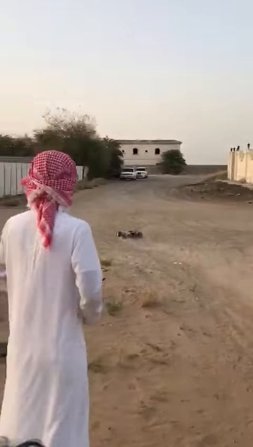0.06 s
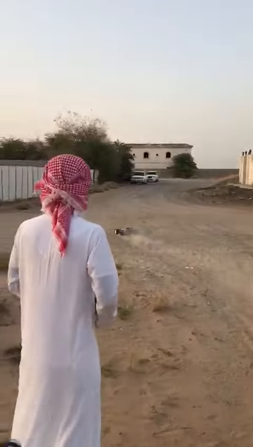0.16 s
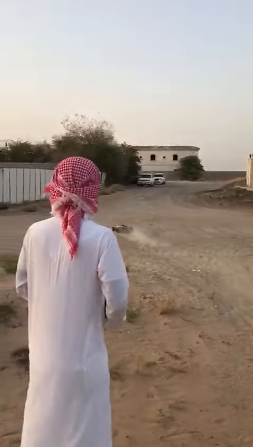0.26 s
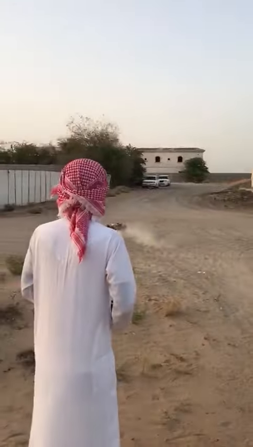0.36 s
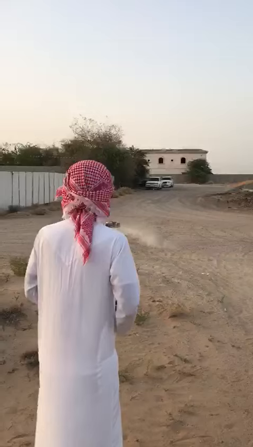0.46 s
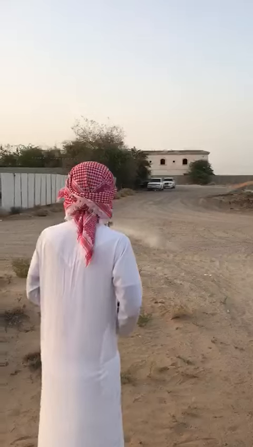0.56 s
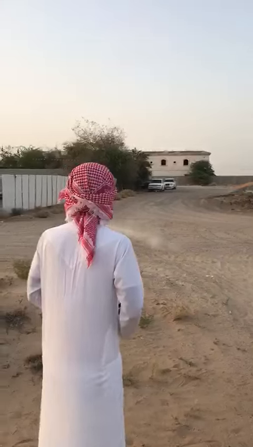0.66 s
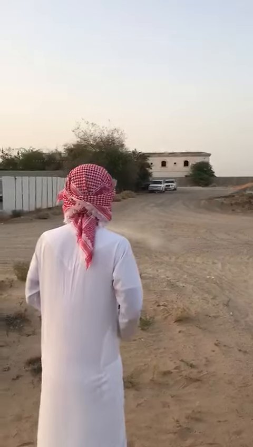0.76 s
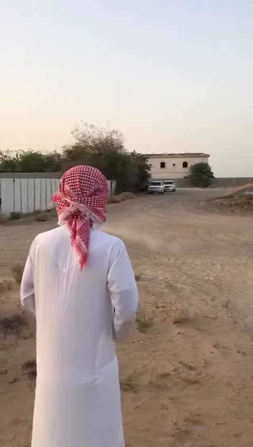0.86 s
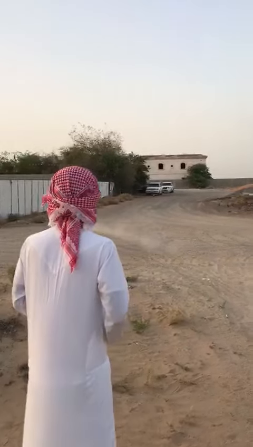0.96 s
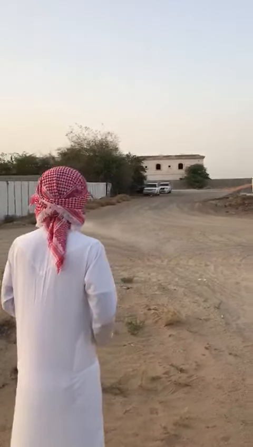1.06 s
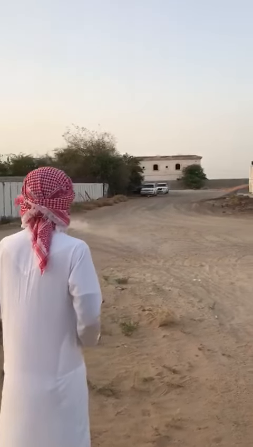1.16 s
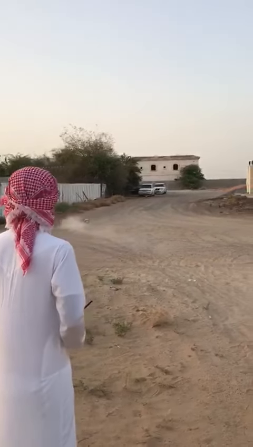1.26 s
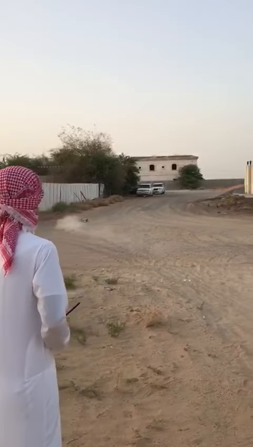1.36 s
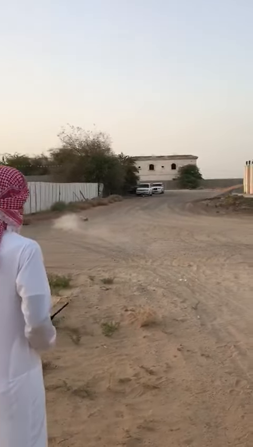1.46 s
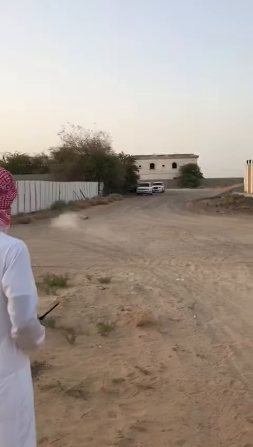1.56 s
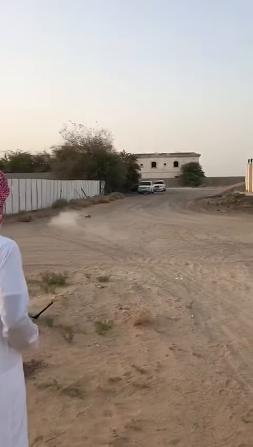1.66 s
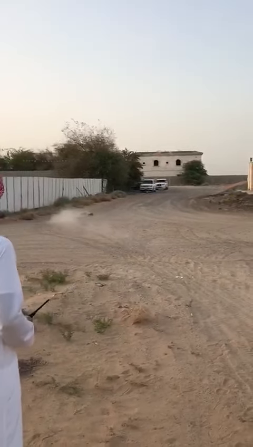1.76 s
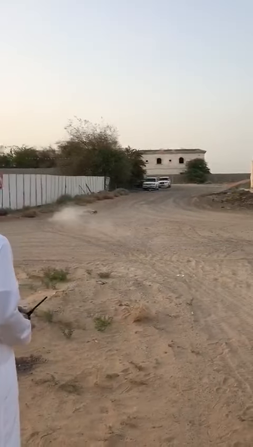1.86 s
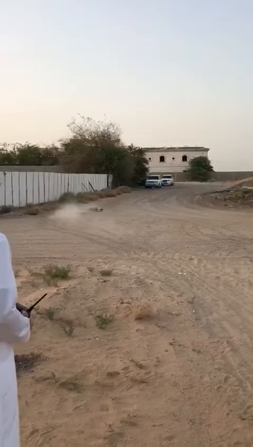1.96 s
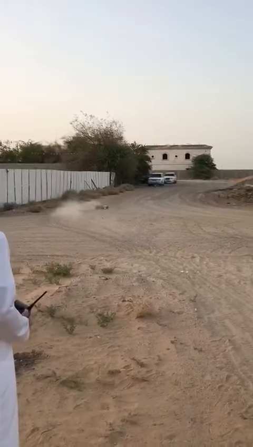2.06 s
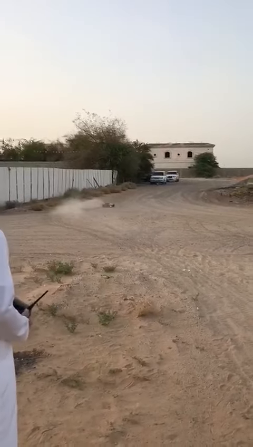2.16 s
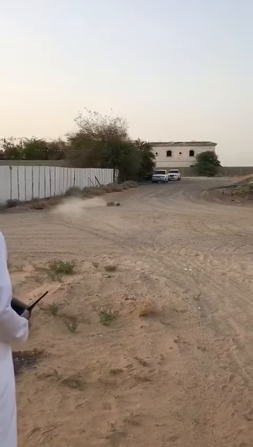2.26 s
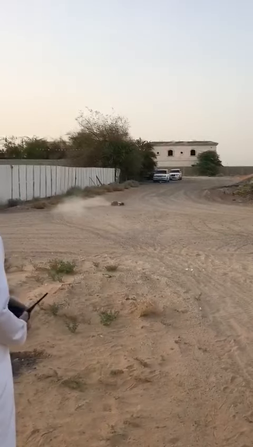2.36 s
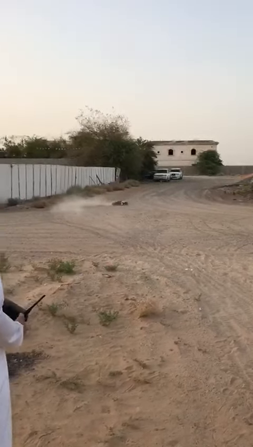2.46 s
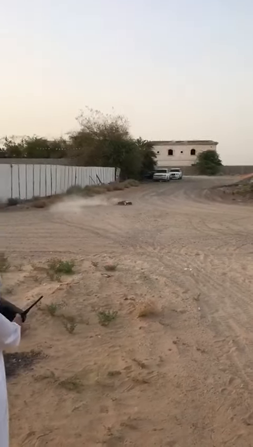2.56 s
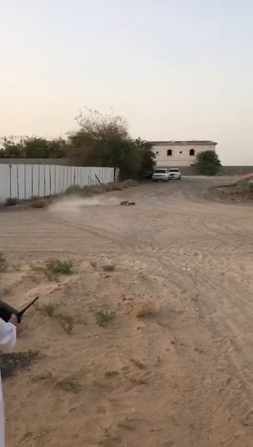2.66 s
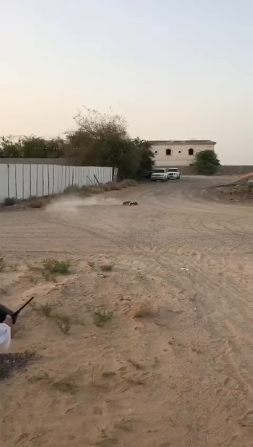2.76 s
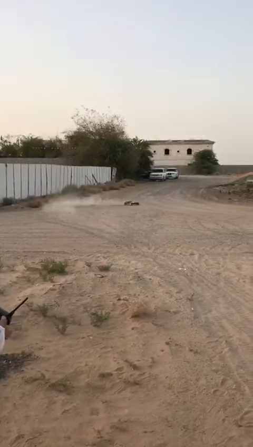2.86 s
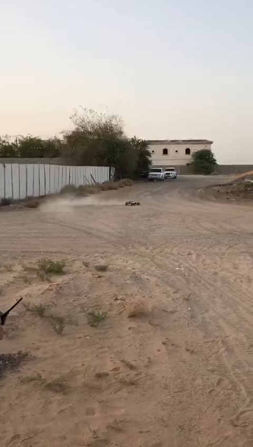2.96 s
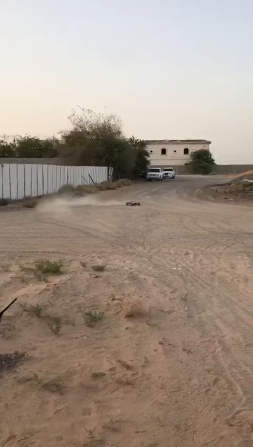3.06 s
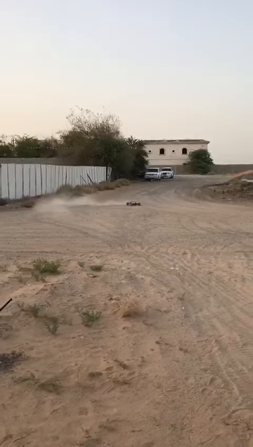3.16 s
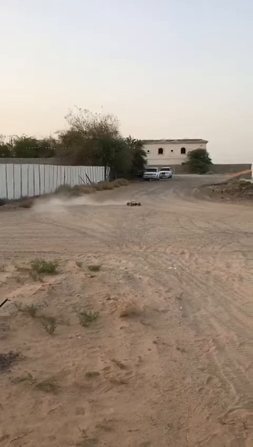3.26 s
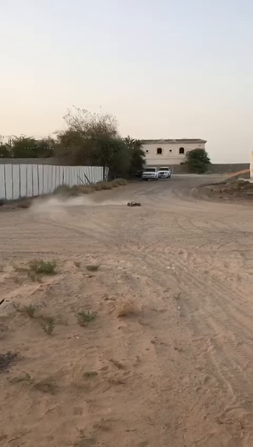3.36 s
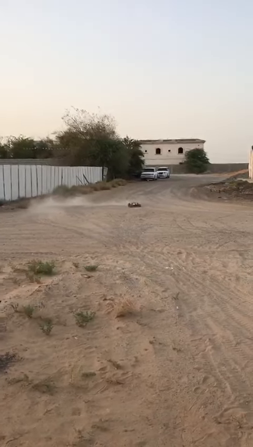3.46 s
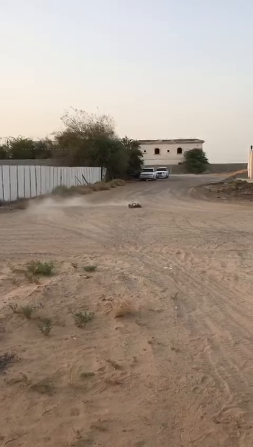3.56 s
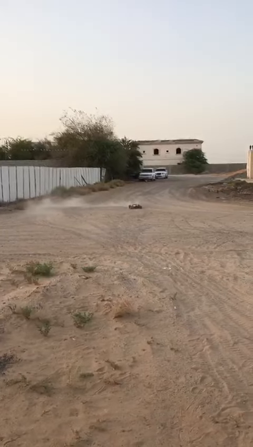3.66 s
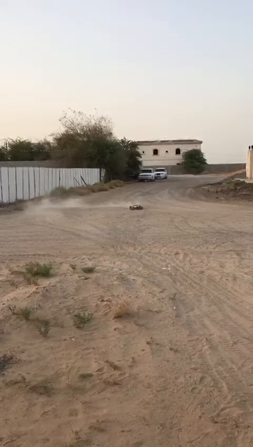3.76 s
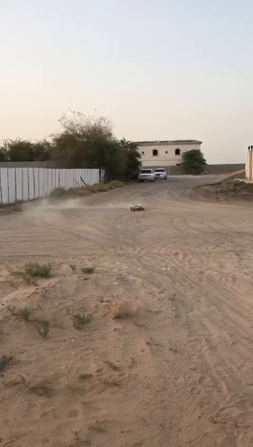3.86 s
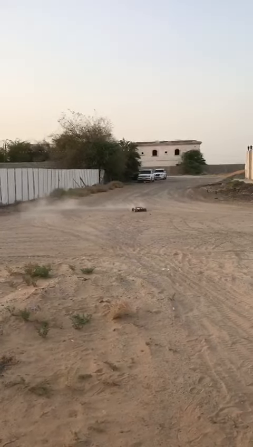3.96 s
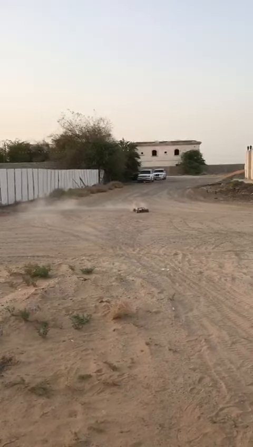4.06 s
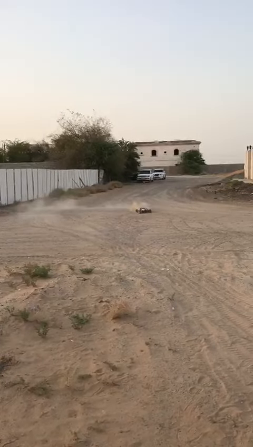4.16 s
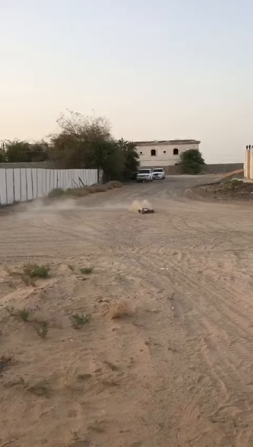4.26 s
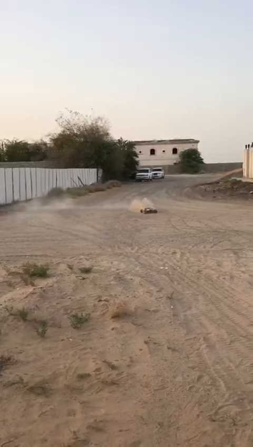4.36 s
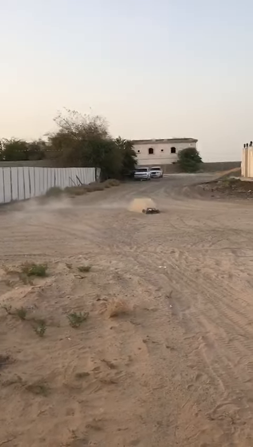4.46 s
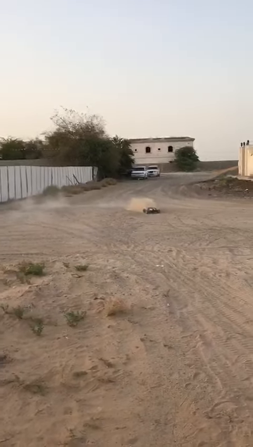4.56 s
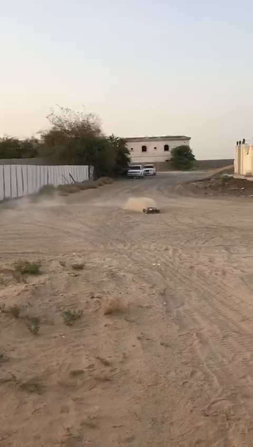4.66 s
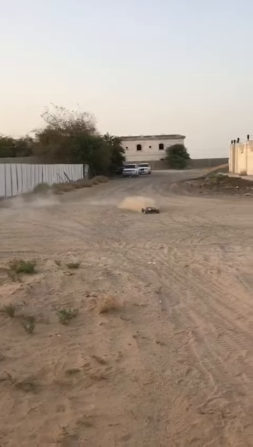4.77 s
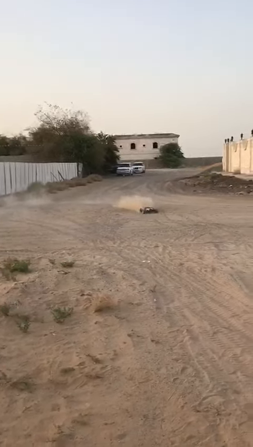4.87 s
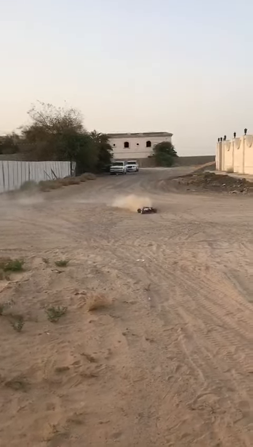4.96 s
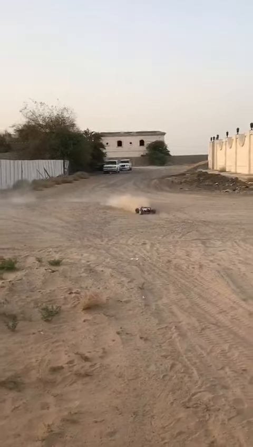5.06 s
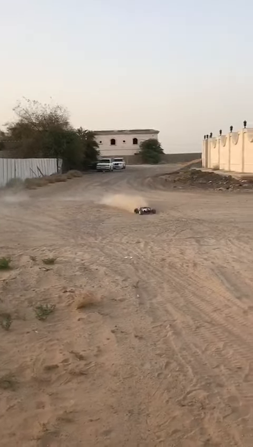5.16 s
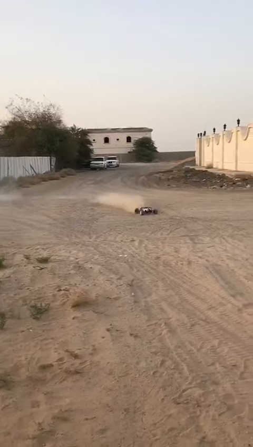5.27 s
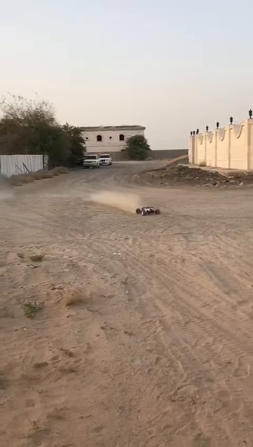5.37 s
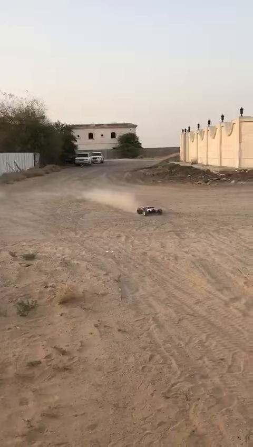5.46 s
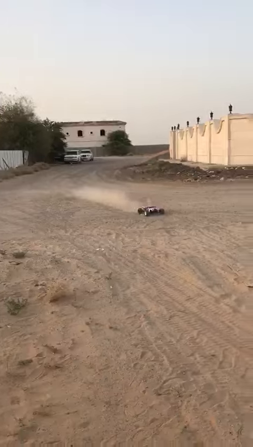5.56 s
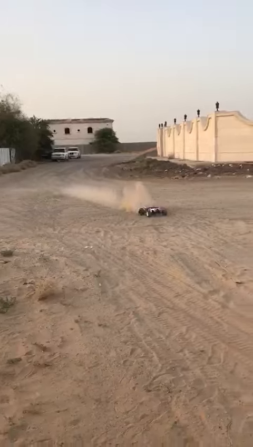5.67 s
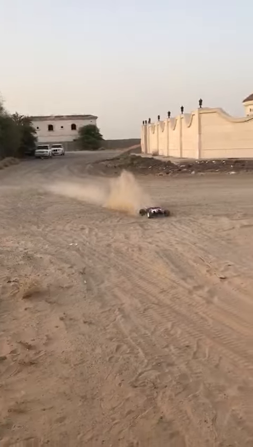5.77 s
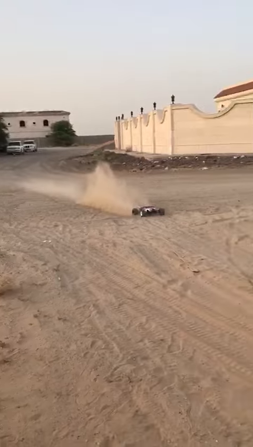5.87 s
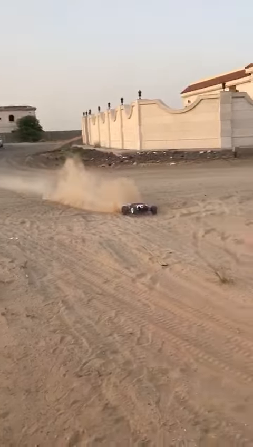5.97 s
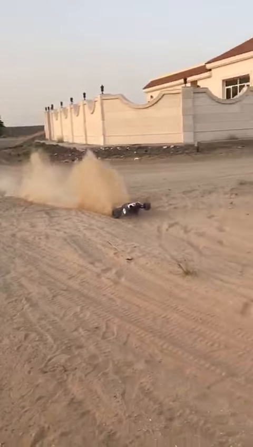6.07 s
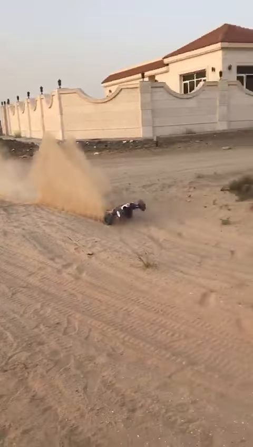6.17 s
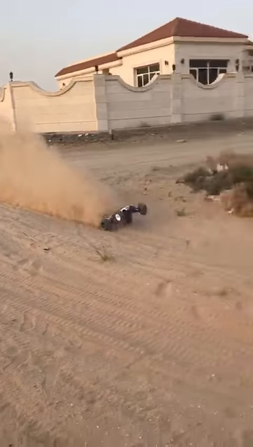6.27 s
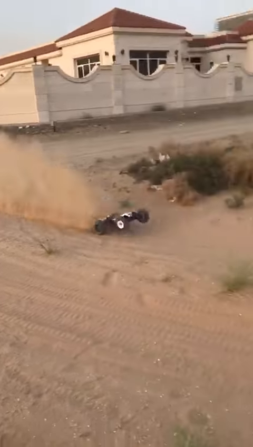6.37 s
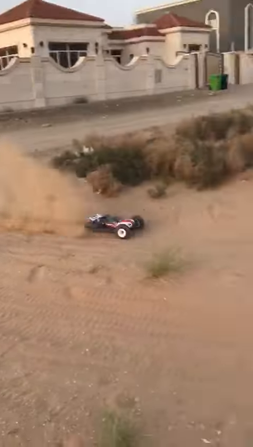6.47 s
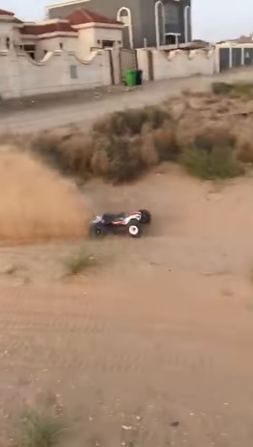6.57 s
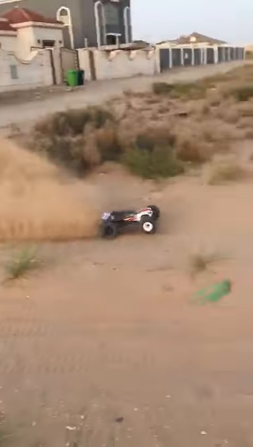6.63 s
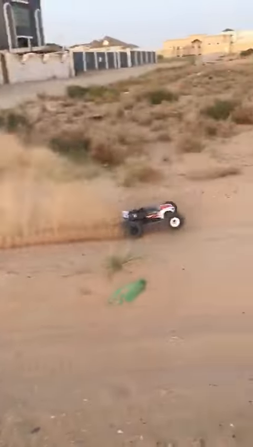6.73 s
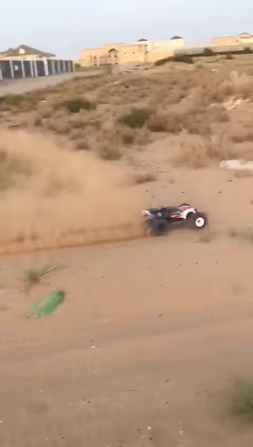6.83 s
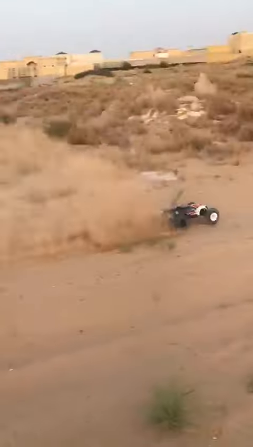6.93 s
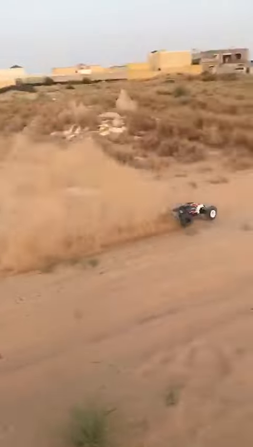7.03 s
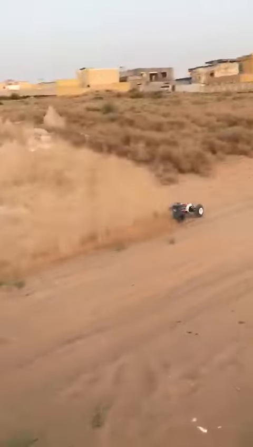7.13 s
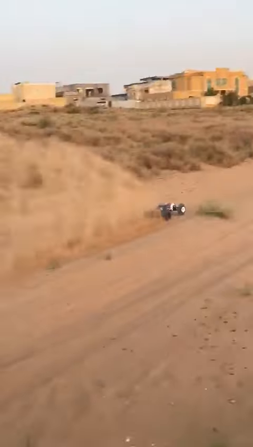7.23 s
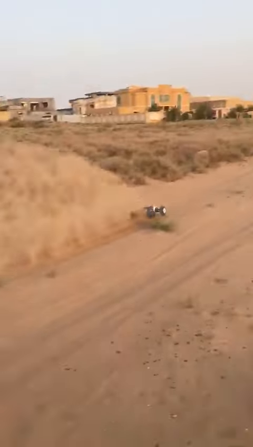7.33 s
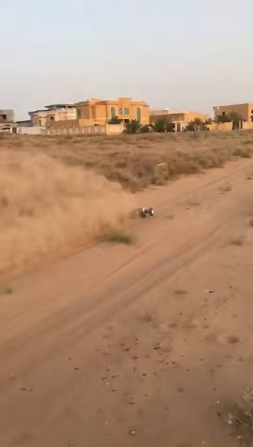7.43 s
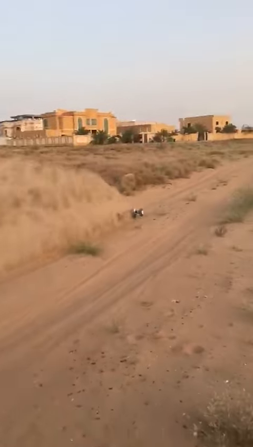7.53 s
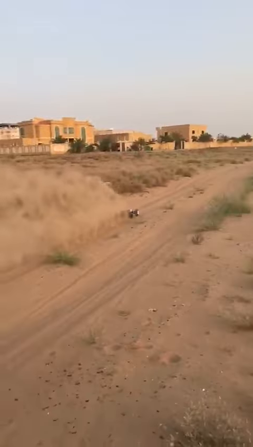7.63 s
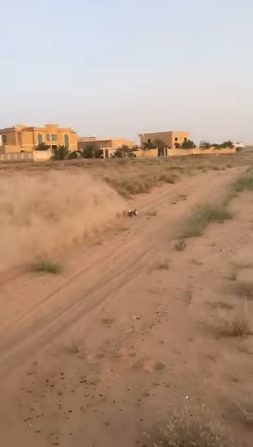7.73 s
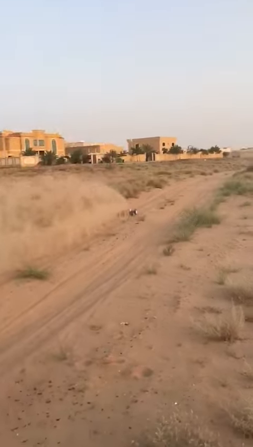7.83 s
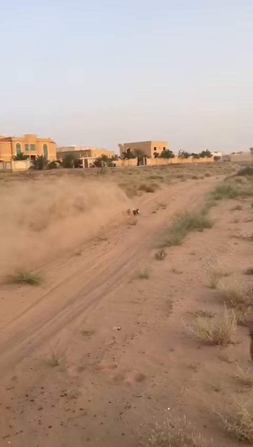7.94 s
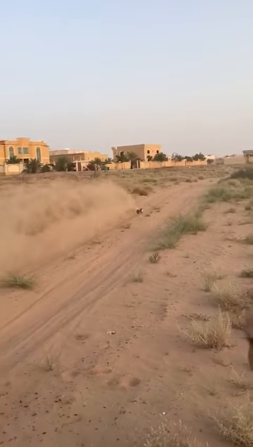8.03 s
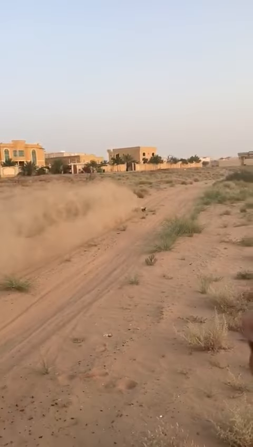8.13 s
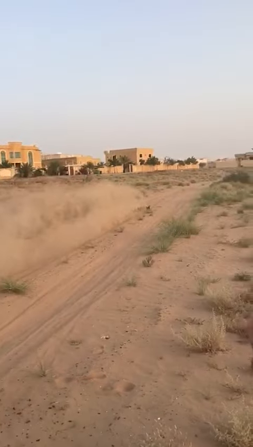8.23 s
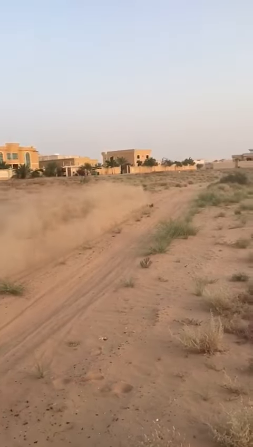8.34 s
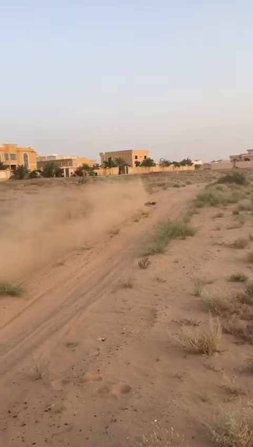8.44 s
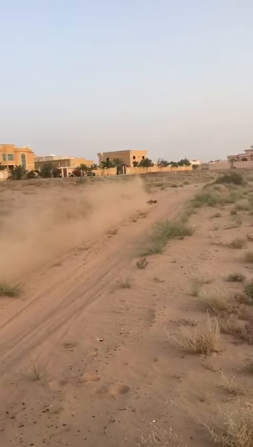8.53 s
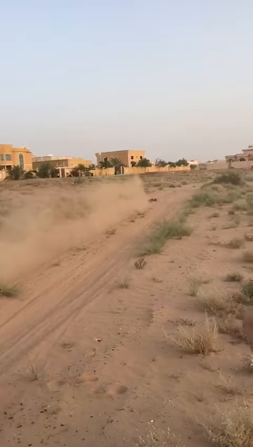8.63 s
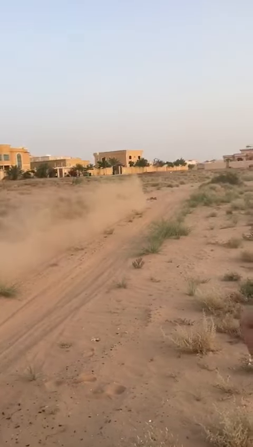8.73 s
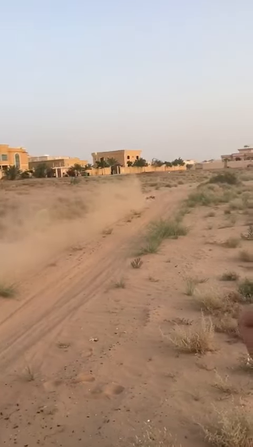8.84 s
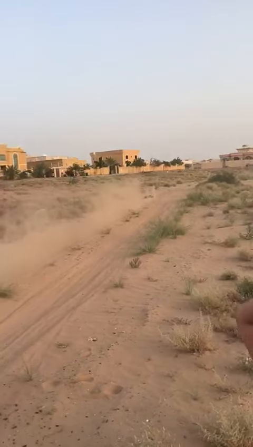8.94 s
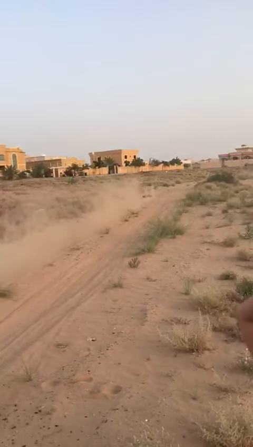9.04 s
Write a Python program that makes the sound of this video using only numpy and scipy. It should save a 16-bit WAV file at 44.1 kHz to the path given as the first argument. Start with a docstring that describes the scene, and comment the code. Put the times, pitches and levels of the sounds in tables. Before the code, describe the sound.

A small electric remote-controlled car runs over sandy dirt, tyres humming and throwing sand against its plastic shell, and a sharp clack sounds close by. It brakes and turns in the distance on two jabs of throttle, knocking over bumps. It returns with a rising gear whine, races close past the microphone with screaming gears and growling wheels, then whirrs away. Light wind touches the microphone in the open air.

```python
"""An electric radio-controlled truggy on sandy dirt, heard from one fixed microphone in light wind. It starts
13 m off, tyres humming and throwing sand at the body shell; a sharp clack sounds close by. It coasts away,
brakes, and turns nearly 30 m out on two jabs of throttle, its chassis knocking on bumps. From 3 s it comes back
with its gear teeth whining, and near 7 s it races past at full power, under 5 m away, gears screaming and
wheels growling. Then the sound drops away abruptly and the gears whirr on faintly into the distance."""
import sys
import numpy as np
from scipy import signal
from scipy.fft import rfft, irfft, next_fast_len
from scipy.io import wavfile
from scipy.ndimage import uniform_filter1d

SR = 44100
rng = np.random.default_rng(int(sys.argv[2]) if len(sys.argv) > 2 else 0)


def wav_out(sig):
    """Save sig, one row per channel (or a flat mono array), as 16-bit PCM at SR to the path in sys.argv[1]."""
    wavfile.write(sys.argv[1], SR, np.round(np.clip(np.atleast_2d(sig).T, -1, 1) * 32767).astype(np.int16))


N = 401303
TIME = np.arange(N) / SR
FREQ = np.maximum(np.fft.rfftfreq(next_fast_len(N), 1 / SR), 1)

# Levels in the tables are relative: each source adds its own gain and colour.
# The car's path. Each row: time in seconds, distance from the microphone in metres.
DISTANCE = [(0, 12.7), (.75, 15.3), (1.7, 29.3), (3.6, 25.7), (4.6, 24.7), (5.5, 13.7), (6.0, 6.36),
            (6.5, 4.87), (6.9, 4.47), (7.45, 7.36), (8.3, 15.54), (9.1, 26)]
# Road speed. Each row: time in seconds, rate at which tread blocks beat the ground in Hz.
TREAD_RATE = [(0, 186.5), (.93, 195.9), (1.7, 47.1), (2.15, 133.5), (2.45, 39.8), (2.7, 110.7), (3.0, 35.4),
              (3.3, 84.7), (4.1, 95.02), (4.6, 159.9), (5.65, 204.5), (5.95, 205.2), (6.5, 227.5),
              (6.75, 249.3), (7.06, 267.5), (8.3, 291.9), (8.75, 241.8), (9.1, 233.7)]
# The long run back and past. Each row: time in seconds, throttle from 0 to 1.
THROTTLE = [(3.04, 0.12), (3.1, 0.3), (4.08, 0.29), (4.14, 0.58), (5.5, 0.49), (6.04, 0.59), (6.15, 1),
            (8.45, 1), (8.47, 0.04)]
# Tread hum, loudest where the tyres slide or dig in. Each row: time in seconds, level in dB.
TREAD_LEVEL = [(0, -19.5), (.8, -17), (1.05, -32), (5.55, -28.5), (5.72, -18), (5.86, -9), (5.93, -19.5),
               (6.25, -23), (6.6, -24), (6.88, -18), (7.1, -24), (7.6, -23.5), (8.1, -18), (8.5, -29.5),
               (8.8, -17.5), (9.1, -32)]
# Sliding tyres. Each row: start and end in seconds, levels of rumble, stones and sand in dB.
SKIDS = [(-.05, 0.051, -42, -17.5, -15.5), (.123, 0.343, -15, -18, -20), (.395, 0.716, -19, -19, -61),
         (0.75, 0.952, -17, -17.5, -24), (0.96, 1.132, -36, -21, -23), (1.193, 1.417, -14.5, -25, -37),
         (1.418, 1.728, -17, -32, -29), (1.785, 1.882, -17, -21, -25.5), (2.1, 2.22, -9.5, -11, -11),
         (2.663, 2.747, -16, -15, -18), (5.645, 5.887, -20, -10, -6)]
# The driver's body screens the sand's hiss as the car passes behind. Each row: time in seconds, gain in dB.
DRIVER_SCREEN = [(.4, -0.5), (.68, -7.5), (.76, 0)]
# Resonances of body shell and chassis. Each row: frequency and width in Hz, level in dB.
SHELL_MODES = [(618, 17, 1), (1030, 97, -2), (1610, 330, 2.5), (3500, 470, -25), (4400, 400, -10),
               (5800, 810, -9), (8470, 630, -13)]
# Spectra of thrown sand, its spray from behind, and the open air. Each row: frequency in Hz, level in dB.
SAND_COLOUR = [(35, -38), (60, -1), (146, -1.5), (248, -1.5), (395, -7.5), (539, 1), (785, -3.5), (917, 6),
               (1250, -0.5), (2660, -6), (5280, -17.5), (6450, -14.5), (7370, -17), (11200, -34),
               (12000, -41), (15600, -54), (22000, -120)]
TRAIL_COLOUR = [(59, -43), (100, -22), (227, 13), (283, 5), (390, -3), (560, -38), (787, -51), (962, 10),
                (1300, -8), (1860, 5), (2730, -2.5), (4780, -3), (5830, -25), (7420, -36), (12000, -60),
                (15600, -48), (22000, -120)]
AIR_COLOUR = [(15, -35), (25, 15), (86, 5), (187, 5), (418, -13), (954, -4), (1920, -15.5), (5970, -22),
              (7540, -32.5), (9270, -25), (12000, -74), (15600, -70), (22000, -120)]
# Wind bumping the microphone. Each row: centre in seconds, level in dB, length in seconds.
WIND_PUFFS = [(0.05, -36.5, 0.05), (0.552, -29, 0.014), (0.676, -24, 0.0086), (0.746, -32, 0.04),
              (1.411, -33, 0.026), (2.418, -40.5, 0.045), (2.568, -45.5, 0.081), (2.798, -40.5, 0.087),
              (2.887, -35, 0.035)]
# Thumps as the suspension bottoms, hard clacks close by, and chassis knocks on bumps.
# Each row: start in seconds, level in dB, time to fall 60 dB in seconds.
THUMPS = [(.155, -38.5, 0.53), (2.16, -35, 0.12), (2.685, -42, 0.38), (4.57, -51, .15), (5.15, -43, .13),
          (6.04, -38, 0.16), (6.565, -23.5, 0.23), (6.84, -35, .2)]
CLACKS = [(.1635, -21, 0.019), (.198, -6.5, 0.025), (.2015, -15, 0.0073), (.209, -12, .015),
          (.2128, -25, 0.019), (.215, -11, 0.023), (.591, -33, 0.014), (2.526, -36.5, 0.033),
          (2.871, -37, 0.028), (2.888, -34, 0.026)]
KNOCKS = [(1.797, -51, 0.077), (2.165, -40, 0.066), (2.231, -41, 0.066), (2.254, -33, 0.091),
          (2.275, -43.5, 0.18), (2.563, -45, 0.07), (2.678, -45, .05), (3.011, -54, 0.034),
          (3.046, -39, 0.03)]
# Spectra of those three blows. Each row: frequency in Hz, level in dB.
THUMP_COLOUR = [(60, -22), (130, -10), (220, 6.5), (330, -10.5), (480, -1), (800, -9.5), (1300, -29),
                (3000, -45), (22000, -120)]
CLACK_COLOUR = [(180, -43), (300, -41), (659, -10), (793, -17), (1050, -12), (2030, 1), (2520, -6.5),
                (3330, -2.5), (11100, -11.5), (12000, -10), (15600, -49), (22000, -120)]
KNOCK_COLOUR = [(88, -43), (150, -21), (905, 0), (1050, -14), (1330, 4.5), (1920, -18), (2720, -12.5),
                (4890, -24), (8950, -26), (12000, -29), (15600, -62), (22000, -120)]
# Thin whines of motor and gears. Each row: start and end in seconds, first and last pitch in Hz,
# bend (1 is straight, more glides late), level at the microphone in dB, roughness from 0 to 1.
SQUEALS = [(0.75, .92, 5940, 4750, 0.77, -47.5, 0.73), (0.87, 1.03, 4910, 3600, 0.75, -54, 0.99),
           (0.876, .94, 7250, 6750, 1, -55, .8), (.89, 1.02, 9400, 8200, 1, -60, 1),
           (.97, 1.107, 5950, 5050, 1.1, -52, .8), (1.08, 1.23, 5770, 5400, 1.3, -60, 1),
           (1.6, 1.8, 6400, 5300, 3, -65, .4), (2.67, 2.867, 6530, 5900, 2.7, -61, .4),
           (5.79, 5.937, 5400, 5280, 1.9, -33, 0.65), (6.256, 6.605, 2085, 2585, 0.5, -32.5, .6),
           (6.309, 6.567, 838, 935, 1.1, -31.5, .15), (6.606, 6.756, 920, 1230, 2.01, -28.5, 0.33),
           (6.624, 6.867, 622, 810, 1.4, -38, 0.36), (6.772, 6.857, 561, 580, 1.08, -30, 0.33),
           (6.76, 6.997, 2060, 2440, .9, -35.5, .5), (6.999, 7.177, 1917, 2077, 1.34, -34, 0.37)]
# Housing resonances that the mesh tone sweeps through. Each row: frequency in Hz, gain in dB.
HOUSING_GAIN = [(450, 5), (780, -9), (900, 4.5), (1070, -3), (1170, -8.5), (1320, 6), (1520, -5),
                (1650, -5), (1780, 3), (1870, -4), (1970, -6.5), (2400, -2.5), (3300, 0.5), (4300, -11),
                (5000, -37)]
# Upper harmonics of the mesh. Each row: multiple of the tooth rate, level in dB against the second.
MESH_OVERTONES = [(3, -5), (4, -7), (5, -8), (6, -11)]
# How well the gearbox radiates them. Each row: frequency in Hz, gain in dB.
GEARBOX_GAIN = [(1500, -0.5), (2300, -3.5), (3300, 3), (4200, -0.5), (4900, -13), (5800, -4), (7000, -12),
                (8000, -3), (9600, 3), (11500, -30)]
# The axle gears' growl. Each row: time in seconds, level in dB.
AXLE_LEVEL = [(.8, -40), (.95, -23), (1.3, -30.5), (1.5, -36), (3.2, -55), (4.1, -33), (4.8, -28),
              (5.1, -23.5), (5.55, -27.5), (5.85, -22), (5.97, -32), (6.06, -22), (6.25, -33), (6.9, -26),
              (7.5, -18), (8.44, -18), (8.48, -34), (9.1, -48)]
# Its added tones under load. Each row: multiple of the growl's pitch, level in dB.
AXLE_ORDERS = [(.6, -8), (1.58, -9), (1.89, -3), (2.04, -5)]
# Jabs of throttle. Each row: start and end in seconds, first and last tooth rate in Hz, then in dB the
# whine, its fade over the jab, overtones and sizzle, roughness from 0 to 1, spray and bark in dB.
JABS = [(1.873, 2.097, 620, 3193, -10.5, .5, -17, -14.5, .25, -12.5, -1),
        (2.548, 2.697, 760, 2380, -7.5, 8, -21, -21, .2, -17.5, 5),
        (5.603, 5.789, 2354, 5120, -12.5, 2.5, -15, -18, .8, -16, -10),
        (6.017, 6.15, 3660, 5540, -13, 2.5, -12, -21, .6, -22, -10)]
# Chassis modes that bark as a jab sweeps through. Each row: frequency and width in Hz, gain in dB.
BARK_MODES = [(875, 48, 2), (1300, 53, 1.5), (2360, 100, -7), (4350, 210, -7)]
# The mesh on the way back. Each row: time in seconds, tooth rate in Hz, whine and second harmonic in dB,
# higher harmonics in dB against the second.
APPROACH_MESH = [(3.05, 777, -13, -21, 8), (3.17, 841, -14.5, -22.5, 7), (3.3, 956, -17, -23, 10.5),
                 (3.46, 1035, -14, -26.5, 4.5), (3.68, 1111, -19, -21, -2.5), (4.081, 1147, -21, -23.5, -1),
                 (4.209, 1612, -9.5, -18, 0.5), (4.33, 1552, -22, -22, 3), (4.53, 1590, -18, -26, 6),
                 (4.79, 1760, -11.5, -22.5, 2), (5.03, 1922, -15.5, -28.5, 10),
                 (5.23, 2170, -17.5, -25.5, 6), (5.28, 1990, -14.5, -30, 10), (5.48, 2050, -20, -24.5, 5),
                 (5.609, 2326, -13, -18, 2.5)]
# The mesh at full power, sagging at each landing and running up again.
# Each row: time in seconds, tooth rate in Hz, whistle and rasp in dB.
FULL_POWER_MESH = [(6.12, 5370, -13, -13), (6.2, 6100, -12, -9), (6.26, 6263, -11, -16),
                   (6.31, 6730, -23, -17), (6.55, 6630, -41, -29), (6.6, 5900, -17, -33),
                   (6.65, 5350, -22, -19), (6.715, 5750, -11, -9.5), (6.81, 6370, -23, -18),
                   (6.9, 6600, -13.5, -37), (7.0, 6510, -31, -14), (7.07, 5936, -15, -17),
                   (7.4, 6220, -35, -13.5), (7.48, 6026, -13, -14), (7.68, 5813, -13, -16),
                   (7.76, 5840, -19, -32), (7.83, 6140, -15, -24), (8.0, 5830, -23, -28),
                   (8.45, 6055, -39, -14)]
# Gear case resonances. Each row: frequency and width in Hz, level from the side and from behind in dB.
CASE_MODES = [(3240, 170, -15, -12.5), (3740, 150, -23, -6), (4010, 120, -7.5, -19), (4424, 190, -6, -4),
              (5320, 130, -5.5, -5.5), (5930, 330, -16, -14), (6620, 110, -11.5, -9.5)]
# The wheels slip and run up near the microphone.
# Each row: start and end in seconds, first and last rate in turns a second, bend, level in dB.
WHEEL_SURGES = [(6.15, 6.6, 56, 60, 1.48, -19.5), (6.6, 6.85, 66, 78, 1.26, -16),
                (6.79, 7.3, 61, 67, 1, -16.5)]
# Growl of the spinning wheels. Each row: multiple of the turn rate, level in dB.
WHEEL_ORDERS = [(2, -17.5), (3, -13), (4, -11), (8, -9.5), (9, -10.5), (10, -10.5), (11, -10.5), (14, -12),
                (16, -8.5), (18, -11), (20, -18), (24, -17), (28, -19)]
# Faint whirr of the gears far off. Each row: starting pitch in Hz, level in dB.
COAST_TONES = [(1590, -38), (2630, -36), (3480, -33.5), (4330, -41), (5480, -38), (6300, -40)]

CRUISE_HZ = 251  # tread rate at cruising speed
FULL_START_S, FULL_END_S = 6.12, 8.455  # throttle wide open
TOP_HZ = 12000


def undb(db):
    """Decibels to gain."""
    return 10 ** (np.asarray(db) / 20)


def unit(x):
    """Scale to rms 1."""
    return x / np.sqrt(np.mean(x ** 2))


def curves(rows):
    """Each column of a table, joined by straight lines in time."""
    s, *columns = np.transpose(rows)
    return [np.interp(TIME, s, c) for c in columns]


def during(start, end, fade=0.015):
    """One between two times, with soft ends."""
    return np.clip(np.minimum(TIME - start, end - TIME) / fade + .5, 0, 1)


def progress(start, end):
    """Rises from 0 to 1 between two times."""
    return np.clip((TIME - start) / (end - start), 0, 1)


def release(end, decay_s):
    """One until a time, then dying away."""
    return np.exp(-np.maximum(TIME - end, 0) / decay_s)


def turn(hz):
    """Phase of something that turns at a moving rate."""
    return 2 * np.pi * np.cumsum(hz) / SR


def response(points):
    """Gain at every frequency from (Hz, dB) points."""
    hz, db = np.transpose(points)
    return undb(np.interp(np.log(FREQ), np.log(hz), db))


def band(lo_hz, hi_hz, order=12):
    """Gain of a steep band-pass."""
    return ((1 + (lo_hz / FREQ) ** order) * (1 + (FREQ / hi_hz) ** order)) ** -.5


def filtered(x, gain):
    """Filter by a gain per frequency."""
    return irfft(rfft(x, next_fast_len(N)) * gain, next_fast_len(N))[:N]


def noise(gain):
    """Coloured noise of rms 1."""
    return unit(filtered(rng.standard_normal(N), gain))


def walk(rate):
    """Smooth chance that moves about `rate` times a second; spread near 1."""
    steps = TIME * 2 * rate + rng.random()
    count = int(steps[-1]) + 2
    return np.sqrt(3 / 2) * np.interp(steps, np.arange(count), rng.standard_normal(N // 4)[:count])


def partial(phase, smear, width_hz):
    """A tone of rms 1, part of it smeared into a narrow band by uneven contact."""
    smear = np.clip(smear, 0, 1)
    rough = walk(width_hz) * np.cos(phase) + walk(width_hz) * np.sin(phase)
    return np.sqrt(2 * (1 - smear)) * np.sin(phase) + np.sqrt(smear) * rough


def speed():
    """Road speed as a share of cruising speed."""
    return curves(TREAD_RATE)[0] / CRUISE_HZ


def spin_up(start, end):
    """The S-shaped rise, 0 to 1, of wheels that break loose and run up."""
    u = progress(start, end)
    return u * u * (3 - 2 * u)


def tread_hum():
    """Tread blocks beat the ground; pitch and level follow the road speed."""
    phase = turn(CRUISE_HZ * speed())
    hum = partial(phase, smear=.82, width_hz=17.6) + undb(-14) * partial(2 * phase, .3, 25)
    return hum * undb(curves(TREAD_LEVEL)[0]) * speed() ** 2.1


def dirt_levels():
    """Rumble, rattle, sand and grit in dB at 1 m: skids, rolling, drive and wheelspin add their power."""
    rolling, throttle = speed() ** 1.2, curves(THROTTLE)[0]
    spray = sum(undb(db) * spin_up(start, end) * release(end, .0087) for start, end, *_, db, _ in JABS)
    rumble = stones = sand = 0
    for start, end, rumble_db, stones_db, sand_db in SKIDS:
        slide = progress(start, start + .016) * release(end, decay_s=.09)
        rumble += undb(rumble_db) * slide
        stones += undb(stones_db) * slide
        sand += undb(sand_db) * slide
    screen_db = curves(DRIVER_SCREEN)[0]

    def level(skid, skid_db, rolling_db, drive_db, power, spray_db):
        """One layer's level in dB."""
        drive = undb(drive_db) * throttle ** power
        parts = undb(skid_db) * skid, undb(rolling_db) * rolling, drive, undb(spray_db) * spray
        return 10 * np.log10(sum(part ** 2 for part in parts))

    return (level(rumble, skid_db=-6.5, rolling_db=-23.5, drive_db=-25, power=11, spray_db=-3),
            level(stones, -5, -25.5, -13.5, .86, 4),
            level(sand, -8.5, -27.5, -14.5, 1.76, -3) + screen_db,
            level(sand, -13.5, -33, -18, 1, -2.5) + screen_db)


def shell_gain():
    """Gain of the body shell's resonances; soft plastic keeps them at least 3 percent wide."""
    return np.sqrt(sum(undb(db) ** 2 / (1 + (2 * (FREQ - hz) / max(width, .03 * hz)) ** 2)
                       for hz, width, db in SHELL_MODES))


def grains(per_s, spread_db):
    """Sparse impacts of uneven size."""
    hit = rng.random(N) < per_s / SR
    return unit(hit * rng.choice([-1, 1], N) * undb(spread_db * np.minimum(rng.exponential(size=N), 4)))


def thrown_dirt():
    """Tyres rumble, shake the chassis and throw spurts of sand against the shell."""
    rumble_db, rattle_db, sand_db, grit_db = dirt_levels()
    loose = response(SAND_COLOUR)
    ringing = np.hypot(shell_gain(), undb(-7) * response(TRAIL_COLOUR))
    # with its tail to the microphone, the hollow shell rings out more clearly
    behind = curves([(0, .2), (5.5, .2), (6.3, .29), (7.4, .26), (9.1, .81)])[0]
    spurts = walk(53)

    def layer(db, lo_hz, hi_hz, per_s, spread_db, spurt_db, flicker_db):
        """Impacts in one range, part heard directly and part through the shell."""
        impacts = grains(per_s, spread_db) + .86 * rng.standard_normal(N)
        direct, through = (unit(filtered(impacts, g * band(lo_hz, hi_hz))) for g in (loose, ringing))
        level = undb(db + spurt_db * spurts + flicker_db * walk(22))
        return ((1 - behind) * direct + behind * through) * level

    rumble = layer(rumble_db, 68, 554, per_s=1300, spread_db=.5, spurt_db=1.5, flicker_db=.9)
    rattle = layer(rattle_db, 407, 3500, per_s=1800, spread_db=1, spurt_db=-.5, flicker_db=1.33)
    sand = layer(sand_db, 3200, 6950, per_s=3000, spread_db=-.5, spurt_db=.5, flicker_db=1.9)
    grit = layer(grit_db, 10280, 18200, per_s=7600, spread_db=3, spurt_db=1, flicker_db=.9)
    return rumble + rattle + sand + grit


def wind(eddy_hz=63.2):
    """Single puffs and a steady low flutter on the microphone, over quiet outdoor air."""
    puffs = sum(undb(db) * np.exp(-2 * ((TIME - s) / length) ** 2) for s, db, length in WIND_PUFFS)
    eddies = np.sqrt(2) * np.sin(turn(eddy_hz * np.exp(.35 * walk(51.2))))
    buffet = puffs * (eddies + .3 * noise(band(50, 150, order=6)))
    flutter = undb(-57 + 2.3 * walk(3.1)) * noise(band(50, 92, order=8))
    air = undb(-53) * noise(response(AIR_COLOUR) * band(50, 14000, order=8))
    return buffet + flutter + air


def plastic_hits(rows, colour, gain_db, attack_s=.00054):
    """Short, dense rings of struck plastic."""
    envelope = np.zeros(N)
    for start, db, t60 in rows:
        age = np.maximum(TIME - start, 0)
        envelope += undb(db - 60 * age / t60) * (1 - np.exp(-age / attack_s))
    return undb(gain_db) * envelope * noise(response(colour))


def squeal(start, end, from_hz, to_hz, bend, db, rough):
    """A thin tone of motor or gears swells, glides and fades; roughness makes it waver and break up."""
    u = progress(start, end)
    hz = from_hz + (to_hz - from_hz) * u ** bend
    phase = turn(hz * (1 + .016 * rough ** 2 * walk(60)))
    swell = np.sqrt(np.abs(np.sin(np.pi * u)))
    width_hz = 10 + rough * (40 + .04 * from_hz)
    return undb(db + 4 * rough * walk(45)) * swell * partial(phase, rough, width_hz)


def gear_mesh(hz, tone_db, overtone_db, upper_db, smear, width_hz, wobble, rasp):
    """Pinion and spur gear mesh; bumps shake the speed and blur the overtones most."""
    phase = turn(hz * (1 + wobble * walk(34.34)))
    # the housing takes a moment to ring up, so fast sweeps blur its resonances
    housing_db = uniform_filter1d(np.interp(hz, *np.transpose(HOUSING_GAIN)), size=900)
    out = undb(tone_db + housing_db) * partial(phase, smear, width_hz)
    # slow teeth meet softly and make few overtones
    overtone_db = overtone_db - 10 * np.clip((1050 - hz) / 300, 0, 1)
    for k, db in [(2, 0)] + [(k, db + upper_db) for k, db in MESH_OVERTONES]:
        radiated = undb(np.interp(k * hz, *np.transpose(GEARBOX_GAIN))) * (k * hz < TOP_HZ)
        level = undb(overtone_db + db + 2 * walk(14))
        out += radiated * level * partial(k * phase, smear + .08 * k + .15, width_hz * k)
    # the off-centre pinion throbs once a shaft turn; the slower axle gears add a rasp
    throb = 1 + .3 * np.sin(phase / 11) + rasp * np.sin(.4 * phase)
    return out * throb * undb(.78 * walk(49.1))


def braking(start=.76, end=1.207, from_hz=2960, slowing_per_s=1.68, db=-22):
    """The whine falls and loses its overtones as the car brakes into the far turn."""
    age = np.clip(TIME - start, 0, end - start)
    hz = from_hz * np.exp(-slowing_per_s * age)
    overtone_db = db - 29 - 14 * age
    mesh = gear_mesh(hz, db, overtone_db, upper_db=-2, smear=.75, width_hz=160, wobble=.025, rasp=.4)
    return mesh * during(start, end, fade=.06)


def axle_growl(cruising_hz=968):
    """The axle gears growl under throttle; more tones come out once the car is driven hard."""
    phase = turn(cruising_hz * speed() ** .2 * (1 + .008 * walk(12)))
    load = progress(4.64, 5.31)
    load_tones = sum(undb(db) * partial(k * phase, .8, 95) for k, db in AXLE_ORDERS)
    return (partial(phase, 1, 65) + load * load_tones) * undb(curves(AXLE_LEVEL)[0])


def throttle_jabs(sizzle_hz=9770):
    """Each jab sweeps the mesh upwards: a chassis bark, then a gritty rasp and a gearbox sizzle."""
    whine, shake, sizzle_level = np.zeros((3, N))
    for start, end, from_hz, to_hz, whine_db, fade_db, overtone_db, sizzle_db, smear, _, bark_db in JABS:
        rise, gate = spin_up(start, end), during(start, end)
        hz = from_hz + (to_hz - from_hz) * rise
        mesh = gear_mesh(hz, whine_db - fade_db * rise, overtone_db,
                         upper_db=4, smear=smear, width_hz=150, wobble=.028, rasp=.5)
        mesh *= progress(start, start + .039) * gate
        whine += mesh
        shake += undb(bark_db) * mesh
        sizzle_level += undb(sizzle_db) * rise * gate
    sizzle = sizzle_level * partial(turn(sizzle_hz * (1 + .03 * walk(40))), 1, 900)
    grip = undb(1.3 * walk(130))  # the tyres grip and slip, which breaks up the tone
    return chassis_bark(shake) + (whine + sizzle) * grip


def chassis_bark(shake):
    """The chassis modes ring on after the sweeping mesh has struck them."""
    return filtered(shake, sum(undb(db) / (1 + 2j * (FREQ - hz) / width) for hz, width, db in BARK_MODES))


def approach_whine():
    """Gears whine towards the microphone at part throttle, fraying with speed over rough ground."""
    hz, db, overtone_db, upper_db = curves(APPROACH_MESH)
    start, end = APPROACH_MESH[0][0], APPROACH_MESH[-1][0]
    fray = progress(4.95, 5.08)
    lurch = 1 - progress(3.1, 3.6)  # the wheels scrabble as the car pulls away
    mesh = gear_mesh(hz, db, overtone_db, upper_db,
                     smear=.45 + .35 * fray, width_hz=80, wobble=.011 + .03 * lurch, rasp=.15)
    judder = undb(db - 11.5) * fray * partial(turn(.68 * hz), .97, 110)
    # under load the gears also sing an octave below the mesh
    undertone = undb(db - 7) * during(4.45, 5.03, fade=.2) * partial(turn(hz / 2), .6, 45)
    return (mesh + judder + undertone) * progress(start, 3.1) * during(start, end)


def full_power_scream():
    """On the close pass the mesh whistles and rasps, in ragged bursts while the wheels bite."""
    hz, whistle_db, rasp_db = curves(FULL_POWER_MESH)
    ragged = 1 - .75 * progress(6.9, 7.5)
    phase = turn(hz * (1 + .004 * ragged * walk(60)))
    whistle = undb(whistle_db + 1.5 * walk(40)) * partial(phase, .3, 120)
    rasp = undb(rasp_db) * (partial(.98 * phase, 1, 550) + partial(.89 * phase, 1, 350)) / np.sqrt(2)
    chatter = undb(ragged * (2.3 * walk(65) - .6))
    return (whistle + rasp + gear_case() + skip_chirps()) * chatter * during(FULL_START_S, FULL_END_S)


def gear_case(doppler=.025, wander=.014, flicker_db=3):
    """Chattering teeth ring the case; its resonances waver, then sink and settle as the car heads off."""
    behind = progress(7.0, 7.9)
    unrest = 1 - .75 * behind
    out = np.zeros(N)
    for hz, width, side_db, behind_db in CASE_MODES:
        phase = turn(hz * (1 - doppler * behind + wander * unrest * walk(14)))
        db = side_db + (behind_db - side_db) * behind + flicker_db * unrest * walk(9.8)
        out += undb(db) * partial(phase, .88, width)
    return undb(-14.5) * out


def skip_chirps(count=90, start=6.13, end=7.45, low_hz=4700, high_hz=6600, width_s=.016, rise_per_s=1.1):
    """Each skip over a ripple unloads the wheels for a moment, and the gears sing out and run up."""
    out = np.zeros(N)
    for when, pitch, size, glide in rng.random((count, 4)):
        centre = start + when * (end - start)
        near = slice(int((centre - 4 * width_s) * SR), int((centre + 4 * width_s) * SR))
        age = TIME[near] - centre
        hz = (low_hz + pitch * (high_hz - low_hz)) * (1 + rise_per_s * glide * age)
        envelope = undb(-21 + 5 * size) * np.exp(-.5 * (age / width_s) ** 2)
        out[near] += envelope * np.sin(turn(hz))
    return out


def wheel_growl():
    """Lumpy, ballooning tyres shake the chassis on multiples of their turn rate, rising in each surge."""
    rate, envelope = np.full(N, float(WHEEL_SURGES[0][2])), np.zeros(N)
    for start, end, from_hz, to_hz, bend, db in WHEEL_SURGES:
        rate = np.where(TIME >= start, from_hz + (to_hz - from_hz) * progress(start, end) ** bend, rate)
        envelope = np.maximum(envelope, undb(db) * during(start, end, fade=.032))
    phase = turn(rate * (1 + .003 * walk(30)))
    return envelope * sum(undb(db) * partial(k * phase, .4, 14) for k, db in WHEEL_ORDERS)


def distant_whirr(slowing_per_s=.08):
    """Far off, after the sound drops away, the gears whirr on faintly and sink in pitch."""
    phase = turn(release(FULL_END_S, 1 / slowing_per_s) * (1 + .0089 * walk(7.9)))
    whirr = sum(undb(db + 2 * walk(12)) * partial(hz * phase, .9, 60 + .03 * hz)
                for hz, db in COAST_TONES)
    return whirr * progress(FULL_END_S, FULL_END_S + .021)


def scene():
    """At the microphone, in mono: gears and tyres weaken with distance; squeals, blows and wind join."""
    gears = braking() + throttle_jabs() + approach_whine() + full_power_scream()
    gears += axle_growl() + distant_whirr()
    tyres = tread_hum() + wheel_growl() + thrown_dirt()
    car = (gears + tyres) / curves(DISTANCE)[0]
    squeals = sum(squeal(*row) for row in SQUEALS)
    clacks = plastic_hits(CLACKS, CLACK_COLOUR, gain_db=-8.5)
    knocks = plastic_hits(KNOCKS, KNOCK_COLOUR, gain_db=5.5)
    thumps = plastic_hits(THUMPS, THUMP_COLOUR, gain_db=2)
    return (car + squeals + clacks + knocks + thumps + wind())[None]


def record(dry):
    """The phone that serves as microphone cuts the top steeply."""
    return signal.sosfilt(signal.ellip(10, .2, 80, TOP_HZ, fs=SR, output="sos"), dry)


dry = scene()
out = record(dry)
wav_out(out)
```